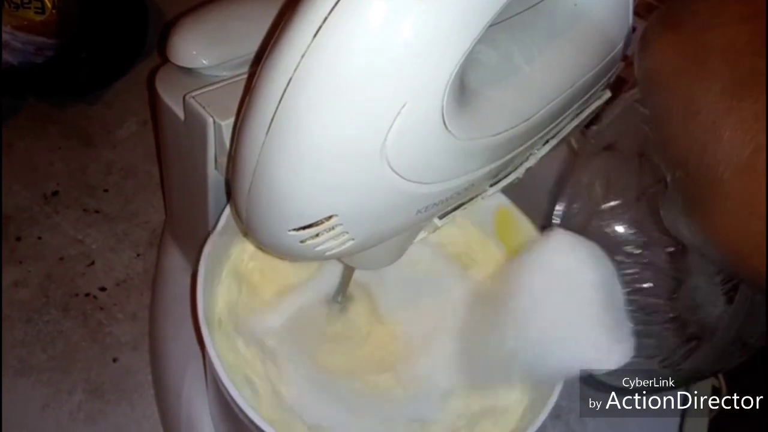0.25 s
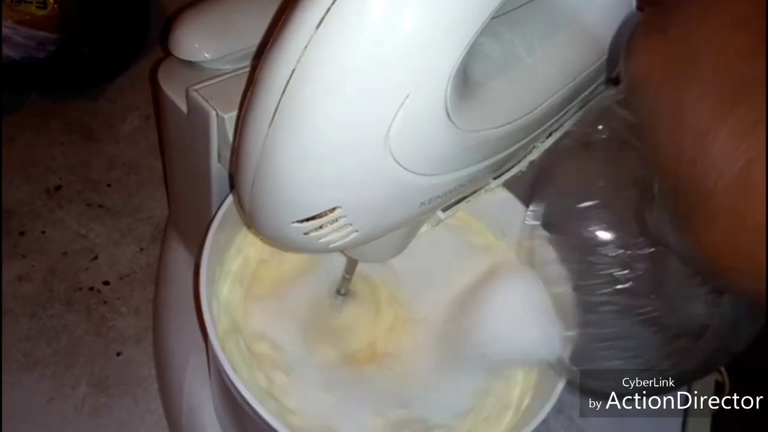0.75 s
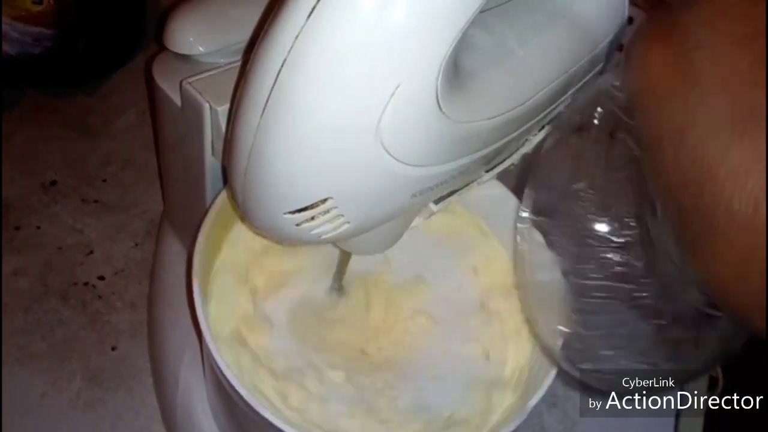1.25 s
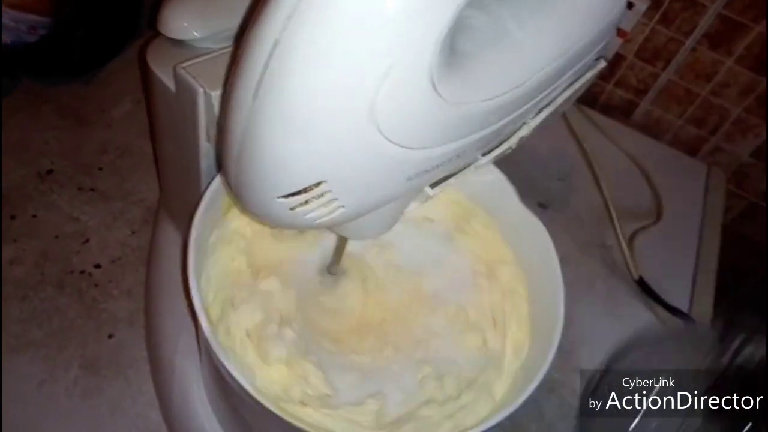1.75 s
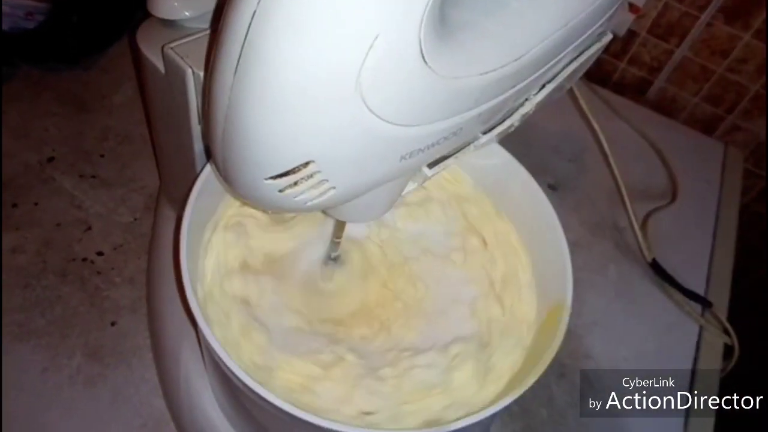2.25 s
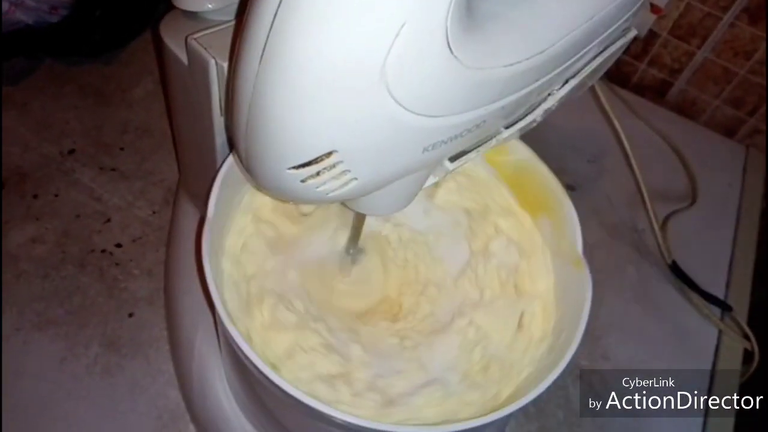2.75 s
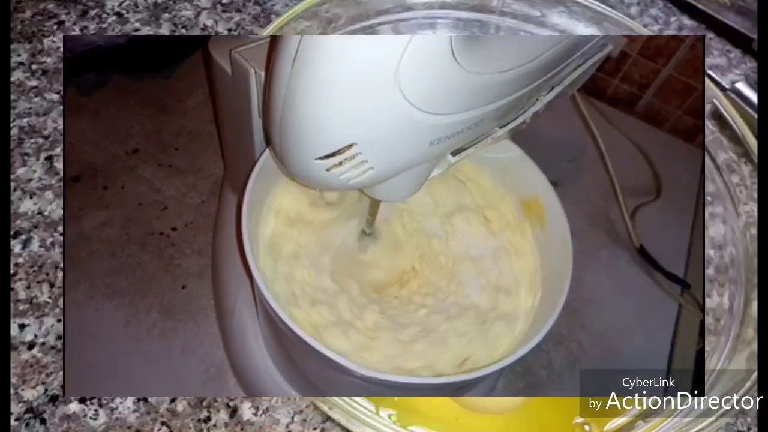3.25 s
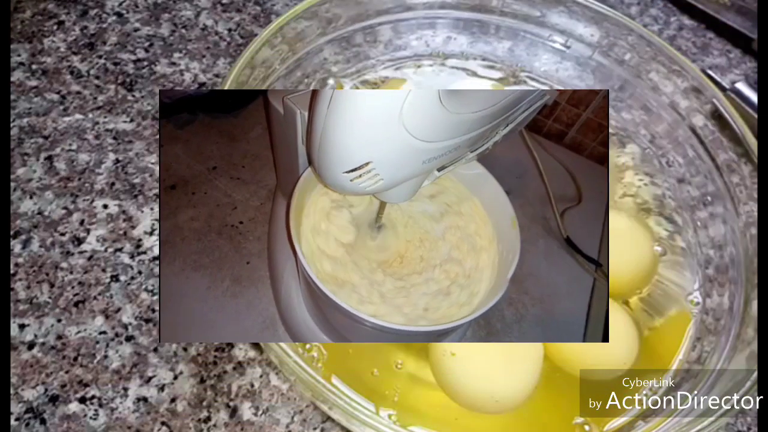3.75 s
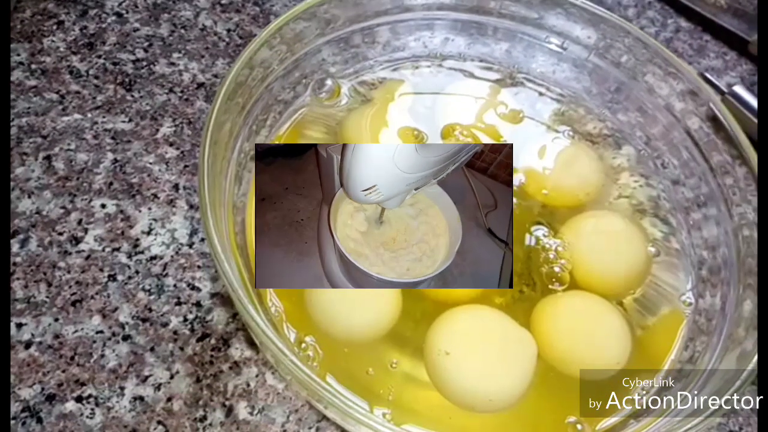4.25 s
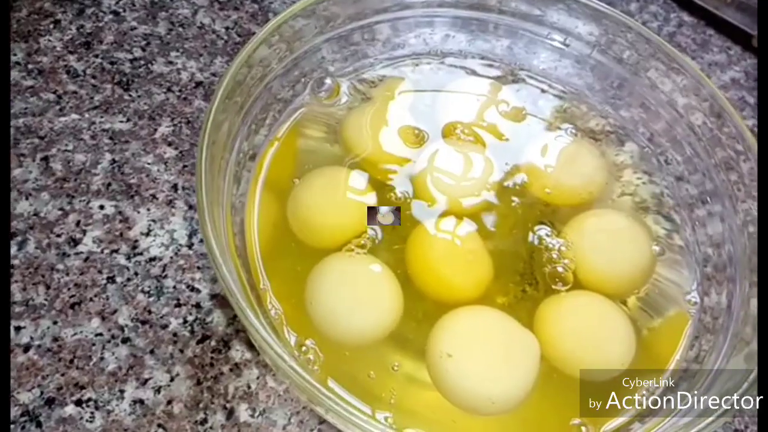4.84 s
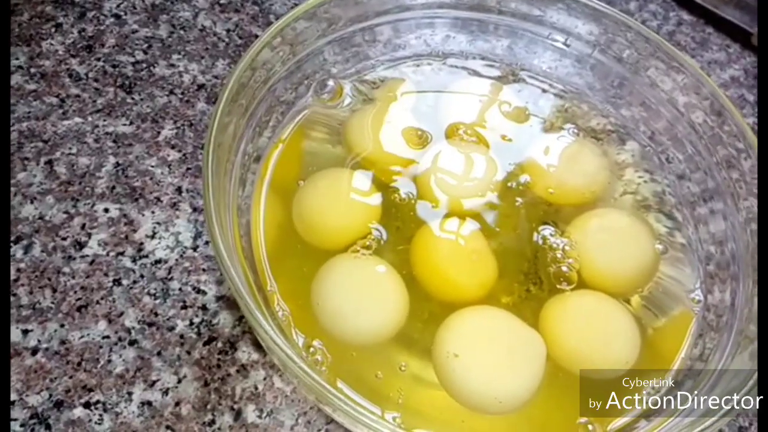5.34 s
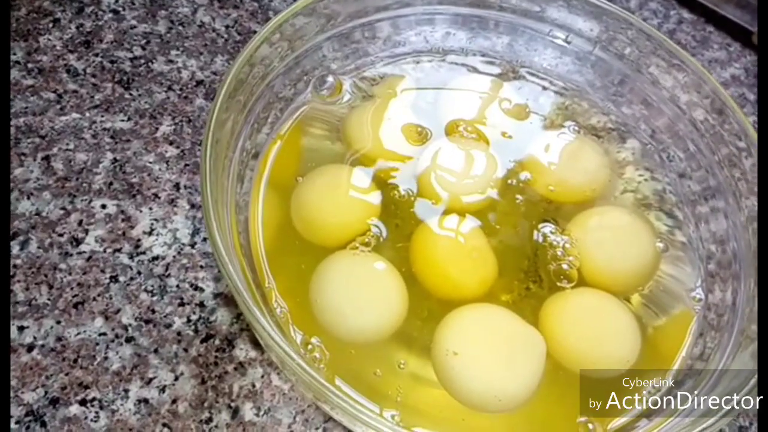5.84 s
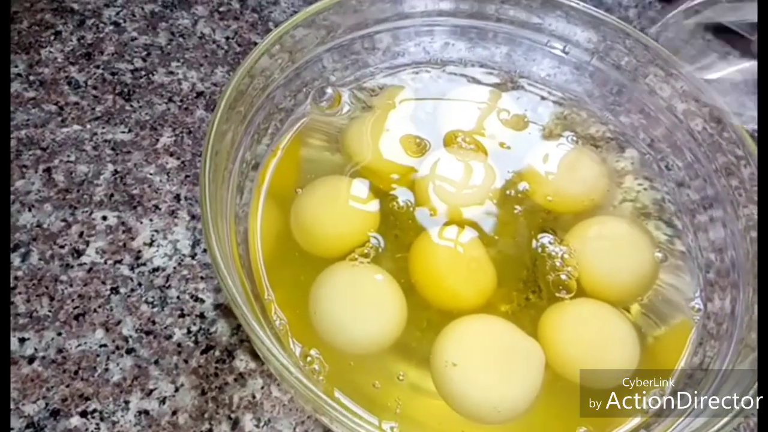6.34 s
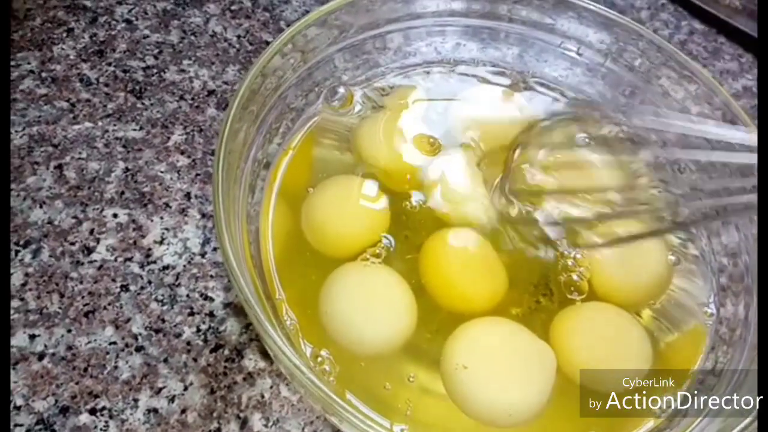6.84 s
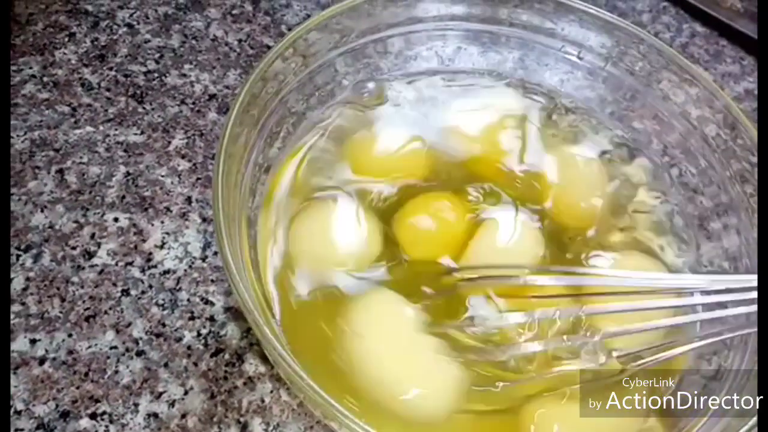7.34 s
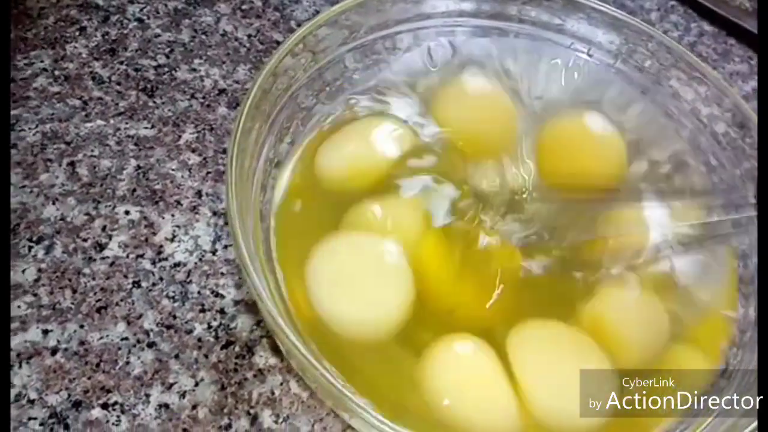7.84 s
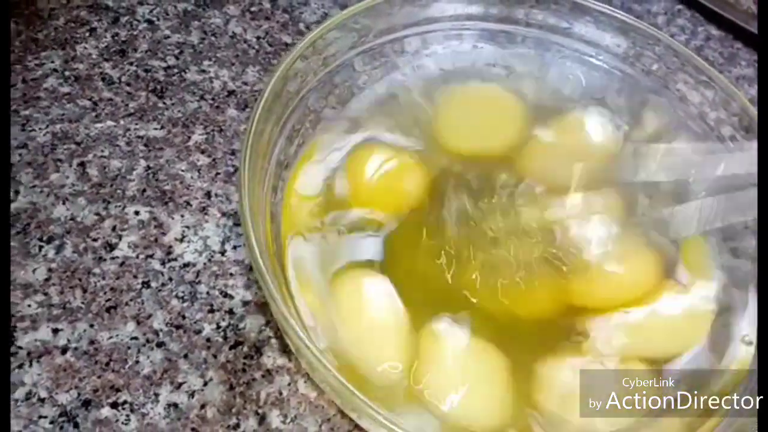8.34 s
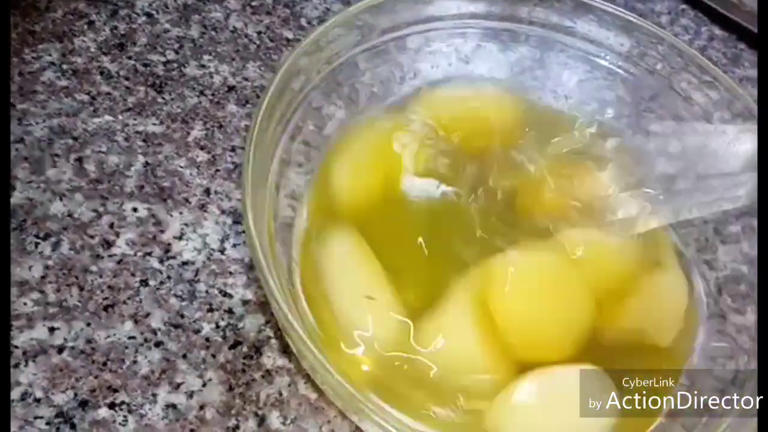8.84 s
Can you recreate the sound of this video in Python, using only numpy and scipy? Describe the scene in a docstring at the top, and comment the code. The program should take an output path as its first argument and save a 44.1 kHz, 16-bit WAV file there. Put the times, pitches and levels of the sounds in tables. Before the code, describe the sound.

From the start, an electric hand mixer runs loud and close in butter and sugar: a steady motor whine, rumbling, rattling gears and a gritty hiss. Sugar lumps tick sharply on the beaters, most often between 2 and 3 seconds, and a beater rasps along the bowl around 3.5 seconds. At 4 seconds the mixer cuts off abruptly. Very quiet kitchen room noise fades in, with faint bird chirps outside until about 7.5 seconds. At about 7.2 seconds a wire whisk knocks on a glass bowl and scrapes down it with a brief ringing squeal. It then stirs eggs, much softer than the mixer, with faint wet swishes, small bubble pops and a faint wavering tone from the rubbed glass. From 8 seconds to just after 9, the wires slap together in several irregular, bright clicks. The sound is mono, with a short small-room echo.

```python
"""First an electric hand mixer creams butter and sugar: its motor whines, the gears rattle, and sugar
grinds and ticks on the beaters. At about 4 s it is cut off abruptly. A quiet kitchen fades in, with
faint chirps of birds outside. Just after 7 s a wire whisk knocks on a glass bowl of eggs and stirs
them: the wires click and rub, the rubbing makes the glass sing, and bubbles pop. The sound is mono."""
import sys
import numpy as np
from scipy import signal
from scipy.fft import rfft, irfft
from scipy.io import wavfile

SR = 44100
rng = np.random.default_rng(int(sys.argv[2]) if len(sys.argv) > 2 else 0)


def unload_wav(signal):
    """Save mono or channel-first audio to the path in sys.argv[1] as 16-bit WAV at rate SR, clipped to [-1, 1]."""
    wavfile.write(
        sys.argv[1],
        SR,
        np.round(np.clip(np.atleast_2d(signal).T, -1, 1) * 32767).astype(np.int16),
    )


N = 400869
TIME = np.arange(N) / SR
MIXER_OFF_S, MAINS_HZ = 4.028, 100   # the mains power pulses 100 times a second
KNOCK_S, SLIDE_S = 7.2389, 0.087   # when the whisk lands on the glass; how long it slides down

# whines of the fan and the commutator, the motor's spinning contact:
# (time [s], fan level [dB], commutator level [dB])
MOTOR_WHINES = [(0, -29.5, -31), (0.6, -33.5, -29.5), (1.05, -34, -33), (1.45, -40.5, -29.5),
                (2.0, -35.5, -31.5), (2.35, -36, -30), (2.7, -41, -31.5), (3.3, -41, -31.5),
                (4.0, -34, -42)]
# tone of grinding sugar: (frequency [Hz], level [dB])
SUGAR_SPECTRUM = [(2200, -32.5), (3400, -9.5), (3900, -2), (4500, 0), (5100, -2.5), (5800, -8), (6600, -11),
                  (7300, -20.5), (8300, -31), (11000, -33.5), (13800, -31), (14800, -20.5), (15500, -18.5),
                  (16500, -32)]
# whisk wires hitting each other:
# (time [s], level [dB], fade time [s], treble tilt [dB per octave], level of the ringing loops [dB])
WIRE_HITS = [(7.123, -60, 0.038, -9, -61), (7.2384, -37, 0.082, -14, -62), (8.119, -32.5, .048, 3, -50),
             (8.7273, -35.5, 0.028, 7.5, -61), (8.863, -25, 0.0091, 16, -71), (8.874, -30.5, .012, 12, -58),
             (9.0627, -35.5, 0.0094, -3, -71), (9.0865, -40, .02, 8, -66)]


def motor(jitter=.0011, flutter_db=1.5, hum_db=-43, hum_flutter_db=3, commutator_bars=12, fan_blades=10):
    """The shaft whines at multiples of its speed and the coils hum; returns sound and shaft angle."""
    # motor speed: (time [s], speed [turns per s])
    speed = [(0, 280.8), (0.6, 278.4), (1.0, 276.9), (1.6, 276.6), (1.9, 277.3), (2.3, 277.0), (2.7, 276.2),
             (4.0, 274.8)]
    # other tones of the shaft: (multiple of the speed [times], level [dB])
    shaft_tones = [(1, -31.5), (2, -34), (3, -51.5), (5, -42.5), (6, -42), (7, -44), (13, -49), (16, -45.5),
                   (20, -41.5), (24, -47.5), (30, -67.5), (36, -66), (38, -66.5), (40, -69.5), (43, -64)]
    shaft = turning(in_time(speed)[0] * (1 + jitter * drift(16)))
    fan_db, commutator_db = in_time(MOTOR_WHINES)
    tones = 0
    for multiple, db in shaft_tones + [(commutator_bars, commutator_db), (fan_blades, fan_db)]:
        gain = from_db(db + flutter_db * drift(15))
        tones += gain * np.sin(multiple * shaft + rng.uniform(0, 2 * np.pi))
    hum_gain = from_db(hum_db + hum_flutter_db * drift(4.7))
    hum = hum_gain * np.sin(turning(MAINS_HZ * (1 + .012 * drift(6))))
    return np.sqrt(2) * (tones + hum), shaft


def brushes(band_hz=(2650, 3550), relative_db=-1, follow=1.2):
    """The motor's brushes hiss on the commutator, close to its whine, and rise and fade with it."""
    band = signal.butter(2, band_hz, "band", fs=SR, output="sos")
    whine_db = in_time(MOTOR_WHINES)[1]
    mean_db = whine_db[TIME < MIXER_OFF_S].mean()
    gain = from_db(mean_db + relative_db + follow * (whine_db - mean_db))
    return gain * unit_level(signal.sosfilt(band, rng.standard_normal(N)))


def gears_and_sugar(shaft, turn_depth=.18, mains_depth=.11, load_wander_db=.31):
    """Gear teeth rumble and rattle the casing while the beaters grind sugar."""
    # tone of the gears: (frequency [Hz], level [dB])
    gear_spectrum = [(20, -35.5), (45, -25), (85, -14), (108, -6.5), (135, -8.5), (175, -1.5), (290, -4.5),
                     (380, 1.5), (560, -1), (780, -3), (900, -6), (1150, -9), (1500, -26), (2500, -60)]
    # tone of the casing: (frequency [Hz], level [dB])
    casing_spectrum = [(600, -41), (1100, -10), (1400, -0.5), (1750, 3), (2150, -2), (2500, -3), (2800, -2),
                       (3300, -5.5), (3700, -10), (4400, -18), (7000, -54)]
    load_db = load_wander_db * drift(2.7)
    # rattling and grinding get harder once a turn and with each mains pulse
    push = 1 + turn_depth * np.cos(shaft) + mains_depth * np.cos(2 * np.pi * MAINS_HZ * TIME)
    # as the sugar works in, there is less rumble and more rattle
    gears = from_db(-24.5 - .3 * TIME + load_db) * colour(grains(2500, 2.0), gear_spectrum)
    casing_db = -28 + .68 * TIME + load_db + .7 * drift(25)
    casing = from_db(casing_db) * colour(unit_level(push * grains(5000, 2.7)), casing_spectrum)
    sugar_db = -25.6 + .24 * TIME + load_db + .91 * drift(25)
    sugar = from_db(sugar_db) * colour(unit_level(push * grains(12000, 1.8)), SUGAR_SPECTRUM)
    return gears + casing + sugar


def beater_rasps(hz=4520):
    """Now and then a beater scrapes along the bowl."""
    # scrapes: (time [s], length [s], level [dB])
    rasps = [(0.05, 0.23, -33), (3.41, 0.3, -25.5), (3.8, .2, -31)]
    band = signal.butter(2, [hz / 1.12, hz * 1.12], "band", fs=SR, output="sos")
    grit = unit_level(signal.sosfilt(band, grains(1500, 3)))
    return swells(rasps, attack_s=.15, release_s=.4) * grit


def housing_drone():
    """The mixer's housing and the bowl drone at their own pitches."""
    # drone tones: (pitch [Hz], width [Hz], level [dB])
    drones = [(169.6, 11, -44), (191.8, 5.6, -40.5), (378, 16, -36), (472.6, 12, -41.5), (582, 20, -40),
              (792, 22, -40), (1885, 30, -43.5)]
    return sum(from_db(db) * resonance(hz, width_hz) for hz, width_hz, db in drones)


def beater_ticks(ring_db=7, snap_db=-11, crumb_db=-18, crumb_hz=4560, pitch_spread=.27, crumb_count=9):
    """Each lump makes a short crunch that rings the beater; small crumbs tick at random times."""
    # bigger lumps: (time [s], level [dB], pitch [Hz])
    lumps = [(0.0952, -14.5, 4300), (0.3286, -11, 4590), (0.9475, -14, 4590), (2.0696, -11.5, 4196),
             (2.187, -8, 3740), (2.3393, -10, 3980), (2.585, -7, 1850), (2.6518, -6, 3676),
             (2.7303, -8, 3840), (2.807, -10, 4450), (3.197, -10.5, 4446), (3.433, -12, 4690),
             (3.588, -9.5, 4380), (3.9, -11, 4550)]
    crumbs = [(when * MIXER_OFF_S, crumb_db, crumb_hz * (1 + pitch_spread * (high - .5)))
              for when, high in rng.random((crumb_count, 2))]
    out, fade = np.zeros(N), dying(.035)
    for s, db, hz in lumps + crumbs:
        crunch = fade * rng.standard_normal(len(fade))
        broad_ring = signal.lfilter(*signal.iirpeak(hz, Q=2, fs=SR), crunch)
        ring = signal.lfilter(*signal.iirpeak(hz, Q=8.2, fs=SR), broad_ring)
        snap = colour(crunch, SUGAR_SPECTRUM, tilt_db=1)
        add(out, s, from_db(db) * (from_db(ring_db) * ring + from_db(snap_db) * snap))
    return out


def glass_bowl(knock_db=-29.5, rub_db=-75, squeal_s=7.355, squeal_db=-51, cushion_hz=6500):
    """The whisk knocks, rubs and squeals on the glass; most of its tones sag as egg climbs the wall."""
    # tones of the glass: (pitch [Hz], level [dB], fade time [s], drop at full wash [Hz], squeal [0-1])
    glass_tones = [(524, -25, 0.38, 7, 0), (1195, -12, 0.049, -3, 0), (1385, -27, .3, 55, 1),
                   (1730, -4, 0.055, 87, 0), (1776, -13, 0.07, 90, 0), (2534, -13, .28, 154.5, .9),
                   (2636, 2.5, 0.04, 144, 0), (2980, -8, 0.046, 2, 0), (3690, -17, .22, 10, .6),
                   (3810, 2.5, 0.17, 58, 0), (5200, -8, .24, 60, 0), (6550, -12, .08, 0, 0),
                   (6770, -9, 0.08, 8, 0), (8560, -24, 0.15, -4, 0), (9475, -26, .12, 3, 0)]
    # egg washing up the wall: (time [s], wash [0-1])
    egg_wash = [(7.29, 0), (7.36, 0.9)]
    force = from_db(rub_db) * swell(KNOCK_S, SLIDE_S, attack_s=.005, release_s=.2) * grains(4000, 1.3)
    add(force, KNOCK_S, from_db([knock_db]))
    force = signal.lfilter(*signal.butter(3, cushion_hz, fs=SR), force)   # a film of egg softens it
    # the sliding wires catch and play the glass like a violin bow
    squeal = from_db(squeal_db + 1.2 * drift(20)) * swell(squeal_s, .088, attack_s=.14, release_s=.15)
    start = int((KNOCK_S - .01) * SR)
    wash, out = in_time(egg_wash)[0][start:], np.zeros(N)
    for hz, db, fade_s, drop_hz, squeal_share in glass_tones:
        # dividing by the spin and multiplying back lets the ring follow a moving pitch
        spin = np.exp(1j * turning(hz - drop_hz * wash))
        decay = np.exp(-np.log(1000) / (fade_s * SR))
        ring = signal.lfilter([1], [1, -decay], force[start:] / spin)
        strength = from_db(db) * ring + squeal_share * squeal[start:]
        out[start:] += rng.choice([-1, 1]) * np.imag(strength * spin)
    return out


def wire_clicks():
    """The whisk's wires slap together in brief buzzing clicks."""
    # tone of a click: (frequency [Hz], level [dB])
    click_spectrum = [(200, -22), (1000, -6.5), (1900, -9), (2800, -18), (3400, 2), (3900, -2), (5500, 3),
                      (7000, -5.5), (8200, -19), (12500, -28), (14000, -17), (15200, -5), (16500, -16)]
    out = np.zeros(N)
    for s, db, fade_s, tilt_db, _ in WIRE_HITS:
        fade = dying(fade_s)
        burst = fade * rng.standard_normal(len(fade))
        add(out, s, from_db(db) * colour(burst, click_spectrum, tilt_db))
    return out


def wire_loops(chatter=.6, spread_db=3):
    """The whisk's loops ring on after a click and chatter together, differently every time."""
    # tones of the loops: (pitch [Hz], level [dB], fade time [s])
    loop_tones = [(480, -8.5, 0.16), (2120, -7, 0.14), (3230, 0, 0.25), (3370, -2, 0.24), (4570, -8, 0.2),
                  (5030, -6, .12), (5800, 0, 0.1), (5800, -7, 0.25), (6580, -8, .12), (7050, -12, 0.16),
                  (7820, -24, .2), (9440, -16, 0.15), (11950, -24, .1)]
    out, touching = np.zeros(N), drift(70)
    for s, *_, hit_db in WIRE_HITS:
        for hz, db, fade_s in loop_tones:
            fade = dying(fade_s)
            at = rng.integers(N - len(fade))
            fade *= 1 + chatter * touching[at:at + len(fade)]
            gain = from_db(hit_db + db + spread_db * rng.standard_normal())
            tone = np.sin(2 * np.pi * hz * TIME[:len(fade)] + rng.uniform(0, 2 * np.pi))
            add(out, s, gain * fade * tone)
    return out


def bubble_pops(attack_s=.00037, spatter_db=-9, spatter_s=.06):
    """Each bubble in the egg rings briefly at its own pitch and leaves a little spatter."""
    # bubbles: (time [s], pitch [Hz], level [dB], fade time [s])
    bubbles = [(7.6957, 3220, -43, .025), (8.12, 1190, -41.5, 0.093), (8.2337, 3180, -37, 0.011),
               (8.7005, 3100, -49, 0.016), (9.019, 2100, -61, .16), (9.036, 2600, -48, .03),
               (9.062, 2060, -29.5, 0.029), (9.084, 1620, -43, 0.044)]
    out, t = np.zeros(N), TIME[:len(dying(1))]
    for s, hz, db, fade_s in bubbles:
        ring = dying(fade_s) * (1 - np.exp(-t / attack_s)) * np.sin(2 * np.pi * hz * t)
        burst = dying(spatter_s) * rng.standard_normal(len(t))
        spatter = signal.lfilter(*signal.iirpeak(hz, Q=3, fs=SR), burst)
        add(out, s, from_db(db) * (np.sqrt(2) * ring + from_db(spatter_db) * spatter))
    return out


def wire_scrape(db=-48):
    """After the knock the wires scrape down the glass."""
    # tone of the scrape: (frequency [Hz], level [dB])
    scrape_spectrum = [(70, -22), (180, -2), (800, -3), (1600, 3), (2100, -7), (2600, -3), (4400, -7),
                       (5200, 8), (6000, -9), (6800, -4), (7400, -28.5), (12000, -46.5), (15000, -34),
                       (16500, -49.5)]
    slide = swell(KNOCK_S, SLIDE_S, attack_s=.0056, release_s=.24)
    return from_db(db) * slide * colour(grains(3000, 4.3), scrape_spectrum)


def egg_swishes(hiss_db=-10):
    """The wires drag through the egg, stirring up froth and a wet hiss."""
    # strokes: (time [s], length [s], level [dB])
    strokes = [(7.15, .02, -68), (7.49, 0.045, -65), (8.02, .07, -73), (8.23, .02, -68), (8.37, .14, -70),
               (8.645, .09, -60.5), (8.885, .04, -58), (9.04, 0.057, -62)]
    # tone of a swish: (frequency [Hz], level [dB])
    swish_spectrum = [(400, -18), (1300, -3), (1900, -16), (2500, 2.5), (3500, 3.5), (4400, -4), (6000, -5),
                      (7500, -21), (9000, -34), (16000, -34)]
    bubbling = unit_level(colour(froth(), swish_spectrum))
    hiss = from_db(hiss_db) * colour(grains(3000, 3.5), swish_spectrum)
    return swells(strokes, attack_s=.15, release_s=.42) * (bubbling + hiss)


def froth(low_hz=1300, high_hz=6500, per_s=35, ring_cycles=300, count=28):
    """Many tiny bubbles and wire touches, each a brief ring at one of many pitches."""
    out = np.zeros(N)
    for hz in np.geomspace(low_hz, high_hz, count) * rng.uniform(.98, 1.02, count):
        decay = np.exp(-np.log(1000) * hz / (ring_cycles * SR))
        feedback = [1, -2 * decay * np.cos(2 * np.pi * hz / SR), decay * decay]
        out += unit_level(signal.lfilter([1, 0, -1], feedback, grains(per_s, 2.8) + 1e-12))
    return unit_level(out)


def singing_glass(gain_db=-1, rough_db=-7, overtone_db=-13, waver=.0092, sag_hz_per_s=74):
    """Rubbing makes the bowl sing; the strongest rub sets the pitch, which sags as the egg climbs."""
    # rubs: (time [s], length [s], starting pitch [Hz], level [dB])
    rubs = [(7.16, 0.027, 700, -65.5), (7.445, .02, 656, -59.5), (7.497, 0.05, 732, -61.5),
            (7.84, .025, 754, -60.5), (7.95, .06, 702, -65), (8.063, .2, 696, -58),
            (8.52, 0.15, 650, -57.5), (8.883, 0.044, 617, -70.5)]
    strengths = np.array([from_db(db + gain_db) * swell(s, length_s, attack_s=.14, release_s=.406)
                          for s, length_s, _, db in rubs])
    start_s, _, start_hz, _ = np.array(rubs)[strengths.argmax(axis=0)].T
    hz = start_hz - sag_hz_per_s * (TIME - start_s)
    tone = np.sqrt(2) * np.sin(turning(hz * (1 + waver * drift(21))))
    roughness = from_db(rough_db) * resonance(hz, 63)
    overtone = from_db(overtone_db) * resonance(1.95 * hz, 47)
    return strengths.max(axis=0) * (tone + roughness + overtone)


def far_birds(direct_db=-3.5, echo_db=-1.5, flock_db=-74, low_hz=3000, high_hz=6200, count=14, fall=.06):
    """Birds outside sing falling, warbling notes, blurred by echoes; fainter ones chirp at random."""
    # nearer chirps: (time [s], pitch [Hz], level [dB], warble [share of the pitch])
    chirps = [(4.41, 4260, -65, .025), (4.45, 5900, -69, .03), (4.47, 1380, -67, .02),
              (4.777, 4290, -60.5, .025), (4.93, 3030, -69, .01), (5.068, 5400, -67, .03),
              (5.18, 4250, -59, .025), (5.19, 5900, -70, .055), (5.49, 4250, -58, .025),
              (5.5, 5700, -68, .055), (5.82, 4190, -60, .025), (6.04, 3300, -70, .025),
              (6.17, 4190, -66, .025), (6.41, 6400, -71, .055), (6.56, 6100, -66, .055),
              (6.7, 5200, -66, .055), (6.82, 5950, -63, .055), (6.98, 5200, -66, .05),
              (7.55, 5750, -69, .045)]
    flock = [(MIXER_OFF_S + when * (KNOCK_S - MIXER_OFF_S), low_hz + high * (high_hz - low_hz),
              flock_db, .02) for when, high in rng.random((count, 2))]
    out, waver = np.zeros(N), drift(109)
    for s, hz, db, warble in chirps + flock:
        at, size = int(s * SR), int((.03 + 1.25 * warble) * SR)   # a twitter outlasts a plain note
        pitch = hz * (1 + fall * np.linspace(.5, -.5, size) + warble * waver[at:at + size])
        add(out, s, from_db(db) * np.sqrt(2 * np.hanning(size)) * np.sin(turning(pitch)))
    return from_db(direct_db) * out + from_db(echo_db) * kitchen_echo(out, fade_s=.4)


def room_tone(tone_db=-70.3, rumble_db=-78.5):
    """The room's soft steady noise, with a low rumble and a hollow hiss that come and go."""
    # steady noise: (frequency [Hz], level [dB])
    room_spectrum = [(15, -40), (25, -15.5), (39, -3), (102, -0.5), (427, -8.5), (607, -8.5), (695, -15),
                     (1160, -13), (2610, -16), (4140, -14), (5570, -18.5), (8360, -32.5), (13200, -32),
                     (14800, -25), (16000, -32)]
    # low rumble: (frequency [Hz], level [dB])
    rumble_spectrum = [(30, -40), (70, -15), (120, 7), (170, -8.5), (300, -9), (500, -30), (1500, -53)]
    # soft thuds in the surroundings: (time [s], length [s], level [dB])
    thuds = [(4.76, .05, -67), (6.79, 0.086, -61), (7.44, 0.036, -69)]
    # hollow hiss: (time [s], level [dB])
    hiss_levels = [(4.1, -81), (4.4, -72.5), (5.0, -75.5), (5.3, -78), (5.7, -69.5), (5.85, -73),
                   (6.0, -83)]
    tone = from_db(tone_db) * colour(rng.standard_normal(N), room_spectrum)
    rumble_gain = from_db(rumble_db) + swells(thuds, attack_s=.25, release_s=.41)
    rumble = rumble_gain * colour(rng.standard_normal(N), rumble_spectrum)
    hiss = from_db(in_time(hiss_levels)[0]) * resonance(680, 100)
    return tone + rumble + hiss


def near_echoes(x, echo_db=-12, count=6):
    """Bowl, worktop and wall send back quick echoes that change the tone; the level stays the same."""
    out = x.copy()
    for lag in (rng.uniform(.002, .022, count) * SR).astype(int):
        out[lag:] += from_db(echo_db) * rng.uniform(-1.1, 1) * x[:-lag]
    return out * x.std() / out.std()


def kitchen_echo(x, fade_s=.21, first_echo_s=.0072, top_hz=9000):
    """The hard walls of a small room give a dense tail of echoes with dull treble."""
    fade = dying(fade_s)
    tail = fade * rng.standard_normal(len(fade)) * (TIME[:len(fade)] > first_echo_s)
    tail = signal.lfilter(*signal.butter(2, top_hz, fs=SR), tail / np.linalg.norm(tail))
    return signal.oaconvolve(x, tail)[:N]


def from_db(db):
    """Turn decibels into a gain to multiply by."""
    return 10 ** (np.asarray(db) / 20)


def unit_level(x):
    """Scale a signal so that its average (rms) level is 1."""
    return x / np.sqrt(np.mean(x ** 2) + 1e-20)


def in_time(rows):
    """Join (time, values...) rows with straight lines: one curve for each value column."""
    s, *columns = np.transpose(rows)
    return [np.interp(TIME, s, column) for column in columns]


def drift(rate_hz, step=40):
    """A smooth random wobble of size about 1, mostly slower than the given rate."""
    decay = np.exp(-2 * np.pi * rate_hz * step / SR)
    noise = rng.standard_normal(N // step + 2002)
    slow = signal.lfilter([1], [1, -2 * decay, decay * decay], noise)[2000:]   # once it has settled
    return np.interp(np.arange(N) / step, np.arange(len(slow)), unit_level(slow))


def colour(x, spectrum, tilt_db=0, size=8192):
    """Shape the tone by (frequency, relative level) points, plus tilt_db per octave above 3000 Hz."""
    octave = np.log2(np.maximum(np.arange(size // 2 + 1), 1) * SR / size)
    hz, db = np.transpose(spectrum)
    curve_db = np.interp(octave, np.log2(hz), db) + tilt_db * np.maximum(octave - np.log2(3000), 0)
    # fold the filter so that it rings only after a click, never before (minimum phase)
    folded = irfft(np.log(from_db(curve_db)))
    folded[1:size // 2] *= 2
    folded[size // 2 + 1:] = 0
    response = irfft(np.exp(rfft(folded)))
    return signal.oaconvolve(x, response / np.linalg.norm(response))[:len(x)]


def turning(hz):
    """The growing angle (phase, in radians) of a tone whose pitch may move."""
    return 2 * np.pi * np.cumsum(hz) / SR


def resonance(hz, width_hz):
    """Something shaken at random rings around one pitch; the wider, the noisier."""
    phase = turning(hz * np.ones(N))
    return drift(width_hz * .75) * np.cos(phase) + drift(width_hz * .75) * np.sin(phase)


def grains(per_s, spread_db):
    """Random clicks of uneven size, at an average level of 1."""
    at = np.flatnonzero(rng.random(N) < per_s / SR)
    out = np.zeros(N)
    signs = rng.choice([-1, 1], len(at))
    out[at] = signs * from_db(spread_db * np.minimum(rng.exponential(1, len(at)), 5))
    return unit_level(out)


def dying(fade_s, length_s=.4):
    """A loudness curve that falls 60 dB in the fade time."""
    return np.exp(-np.log(1000) * TIME[:int(length_s * SR)] / fade_s)


def swell(s, length_s, attack_s, release_s):
    """Rise 60 dB over the attack up to time s, hold for the length, fall 60 dB over the release."""
    outside = np.maximum((s - TIME) / attack_s, (TIME - s - length_s) / release_s)
    return np.exp(-np.log(1000) * np.clip(outside, 0, 10))


def swells(rows, attack_s, release_s):
    """One swell for each (time, length, level) row; at every moment the loudest one counts."""
    curves = [from_db(db) * swell(s, length_s, attack_s, release_s) for s, length_s, db in rows]
    return np.max(curves, axis=0)


def add(out, s, sound):
    """Mix a sound in at time s."""
    at = min(round(s * SR), N)
    out[at:at + len(sound)] += sound[:N - at]


def scene(echo_db=-12, cut_s=.0077, fade_in_s=.27):
    """The mixer runs and stops dead; the quiet kitchen fades in and the whisk starts."""
    whine, shaft = motor()
    mixer = whine + brushes()
    mixer += near_echoes(gears_and_sugar(shaft) + beater_rasps())
    mixer += housing_drone() + beater_ticks()
    running = np.clip((MIXER_OFF_S - TIME) / cut_s + .5, 0, 1)
    hits = glass_bowl() + wire_clicks() + wire_loops() + bubble_pops()
    fade_in = np.clip((TIME - MIXER_OFF_S) / fade_in_s, 0, 1)
    background = fade_in * (room_tone() + far_birds())
    echo = from_db(echo_db) * kitchen_echo(hits)
    stirring = wire_scrape() + egg_swishes() + singing_glass()
    mono = running * mixer + hits + echo + stirring + background
    return np.array([mono, mono])


def record(dry, cutoff_hz=15700):
    """Cut off the highest treble steeply."""
    return signal.sosfilt(signal.ellip(12, .2, 80, cutoff_hz, fs=SR, output="sos"), dry)


dry = scene()
out = record(dry)
unload_wav(out)
```